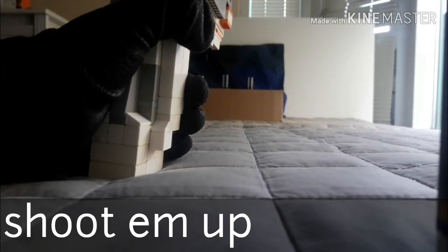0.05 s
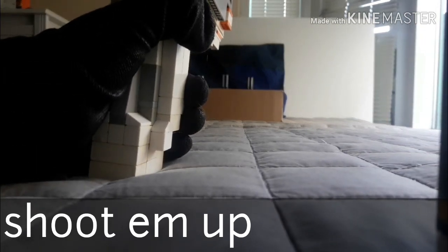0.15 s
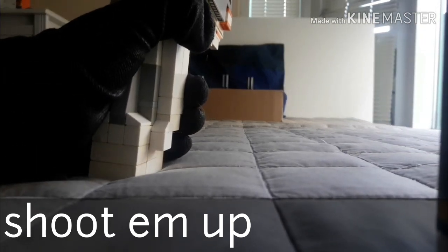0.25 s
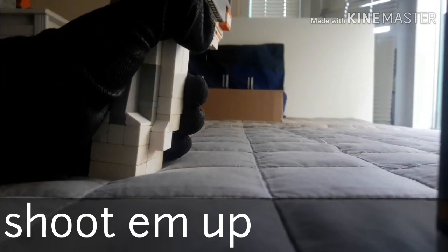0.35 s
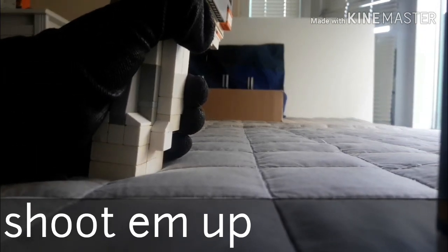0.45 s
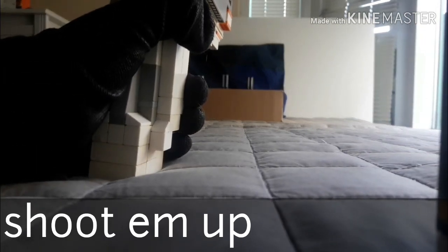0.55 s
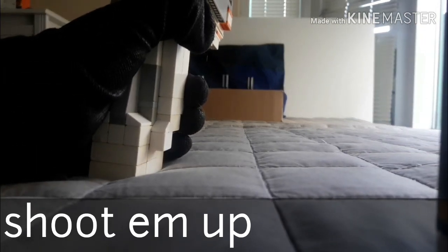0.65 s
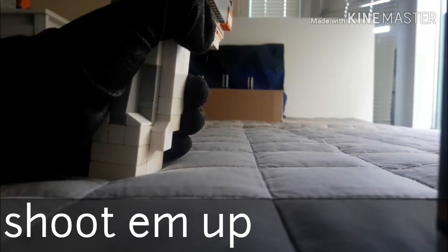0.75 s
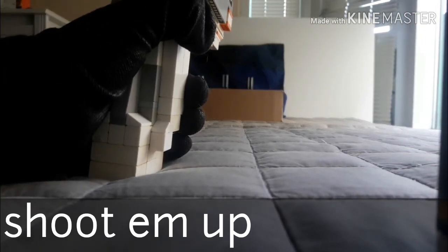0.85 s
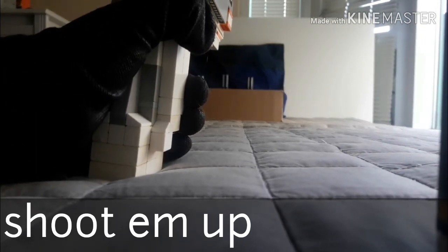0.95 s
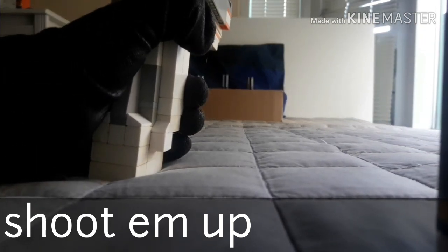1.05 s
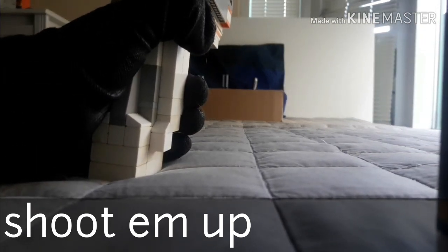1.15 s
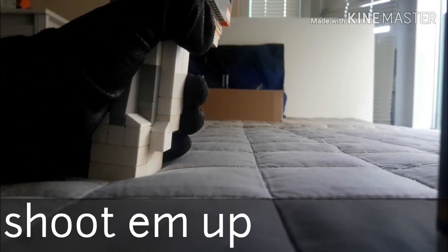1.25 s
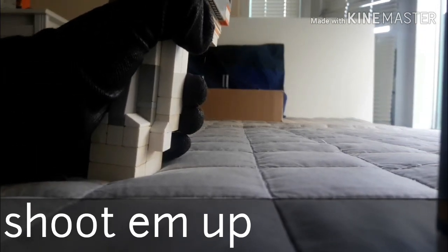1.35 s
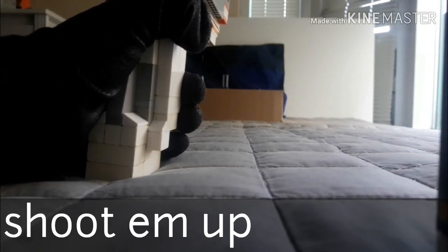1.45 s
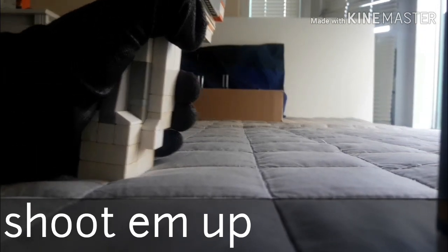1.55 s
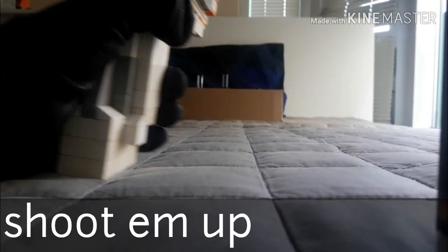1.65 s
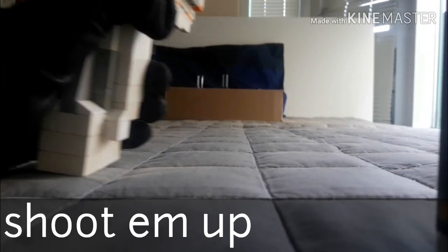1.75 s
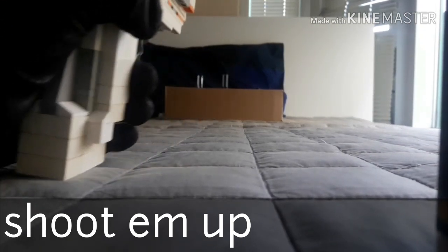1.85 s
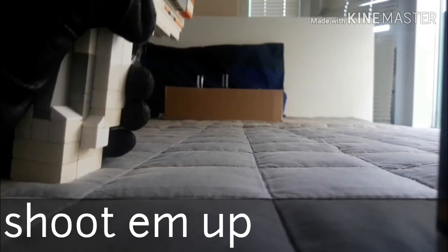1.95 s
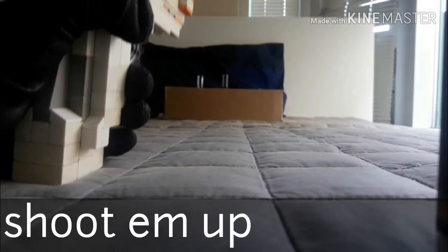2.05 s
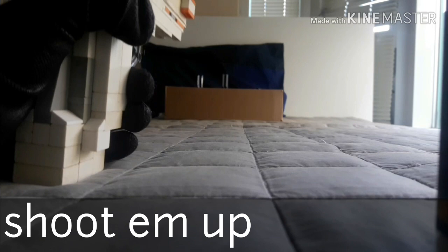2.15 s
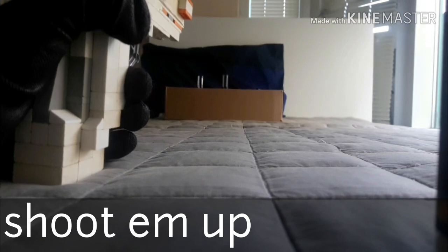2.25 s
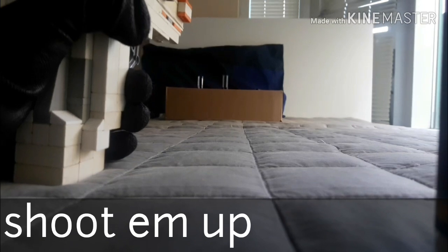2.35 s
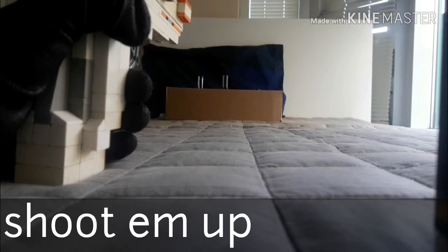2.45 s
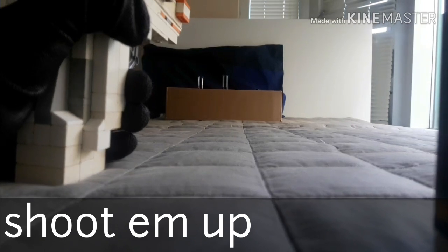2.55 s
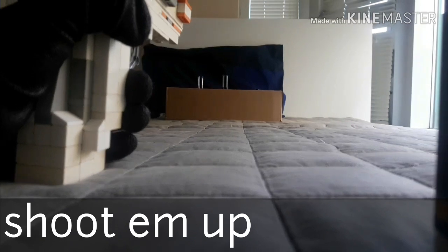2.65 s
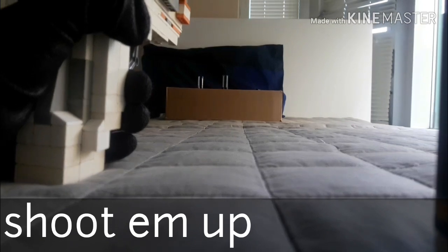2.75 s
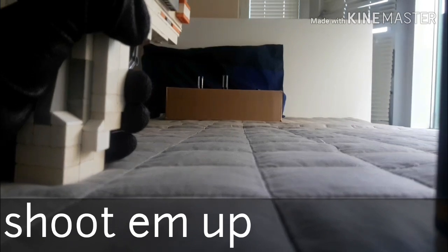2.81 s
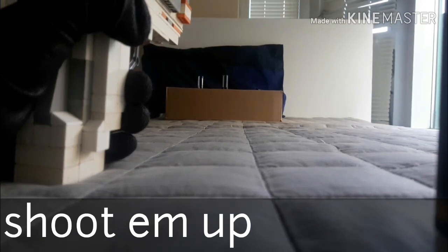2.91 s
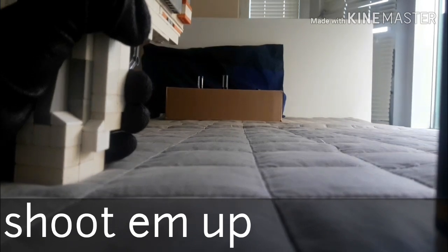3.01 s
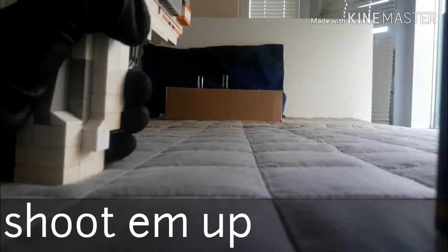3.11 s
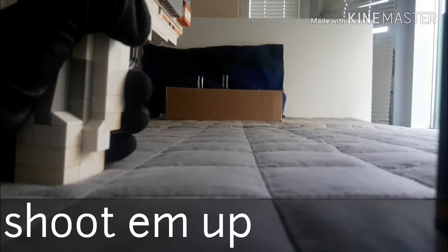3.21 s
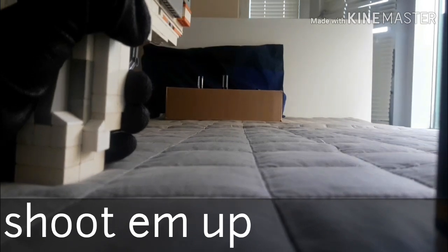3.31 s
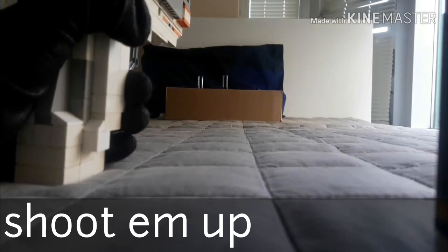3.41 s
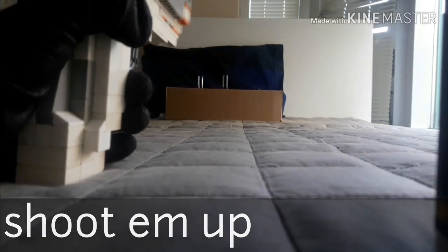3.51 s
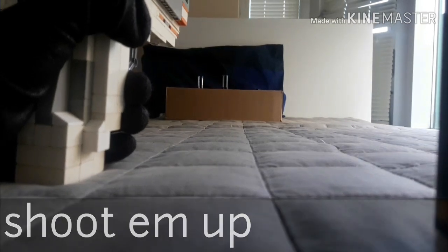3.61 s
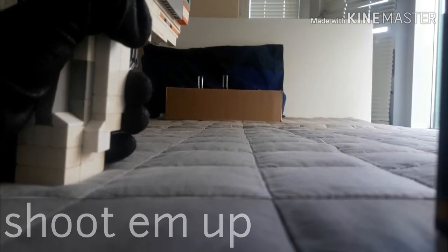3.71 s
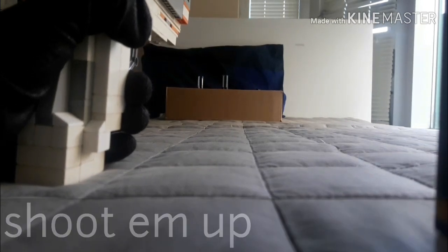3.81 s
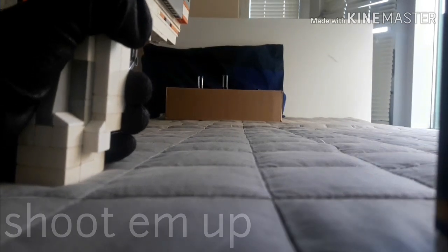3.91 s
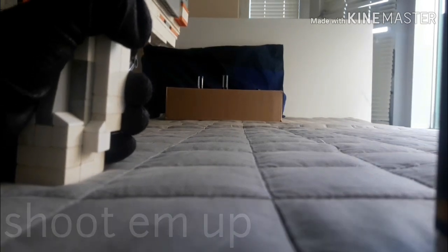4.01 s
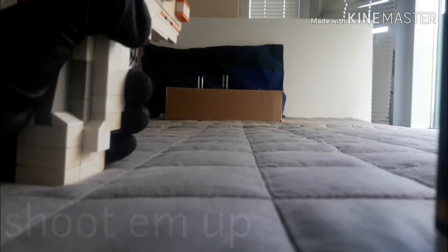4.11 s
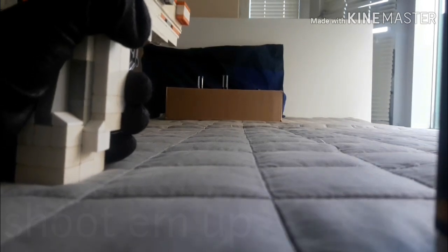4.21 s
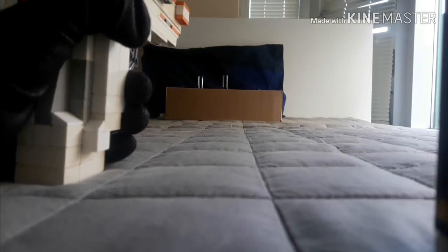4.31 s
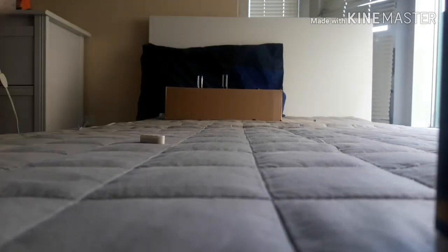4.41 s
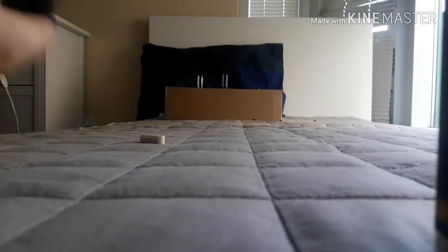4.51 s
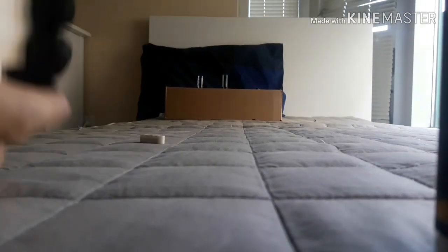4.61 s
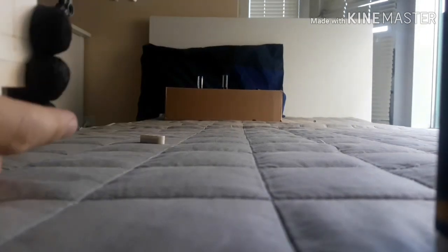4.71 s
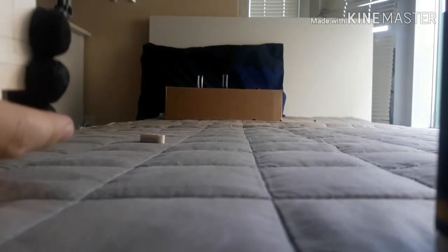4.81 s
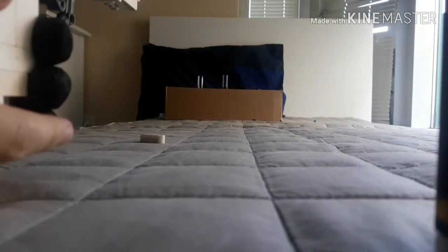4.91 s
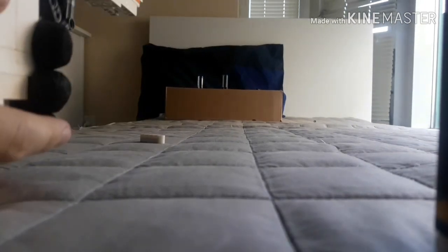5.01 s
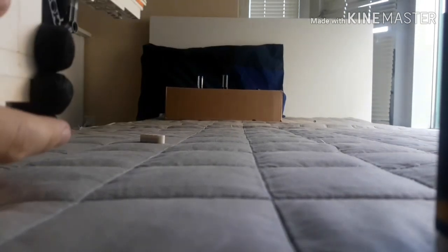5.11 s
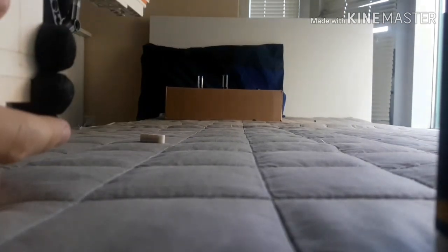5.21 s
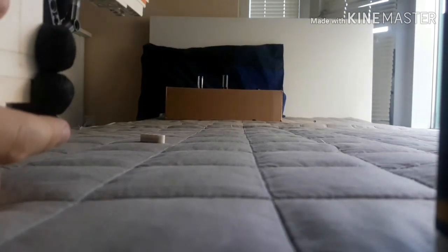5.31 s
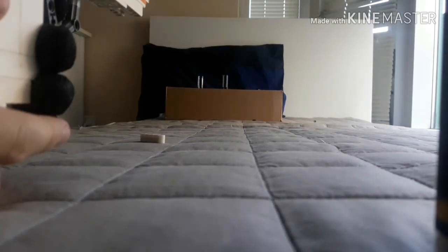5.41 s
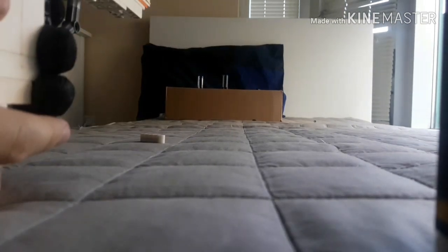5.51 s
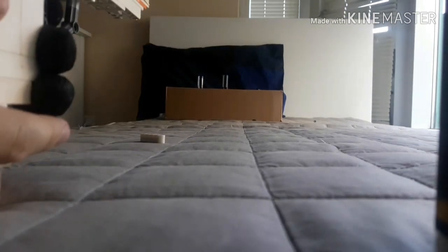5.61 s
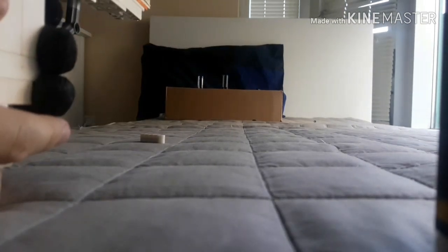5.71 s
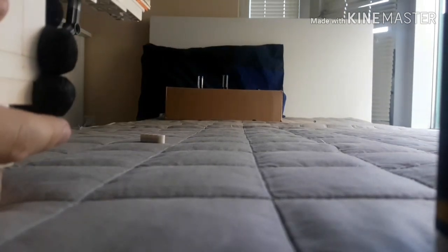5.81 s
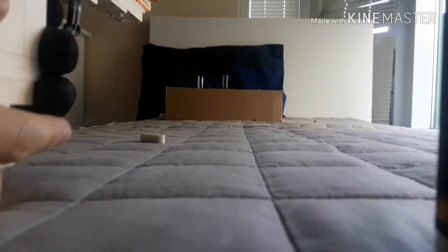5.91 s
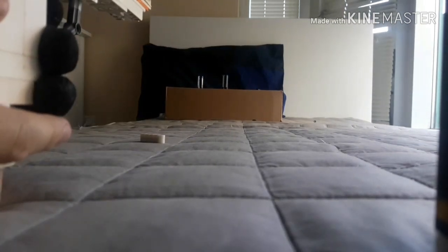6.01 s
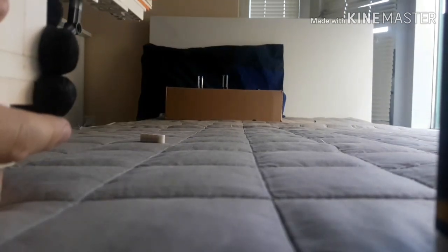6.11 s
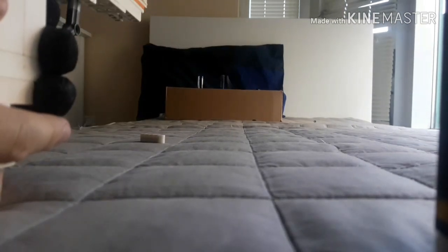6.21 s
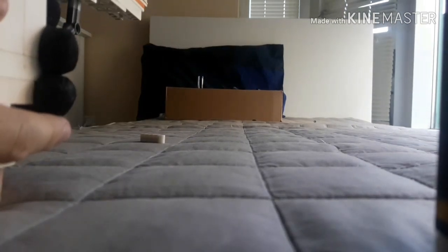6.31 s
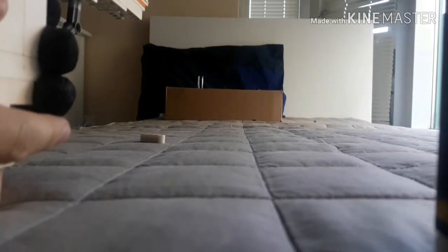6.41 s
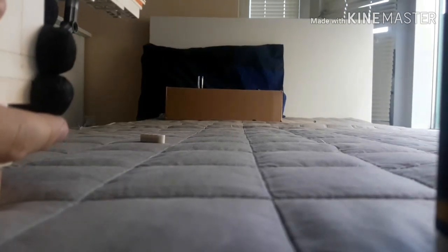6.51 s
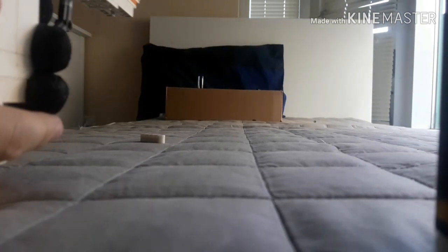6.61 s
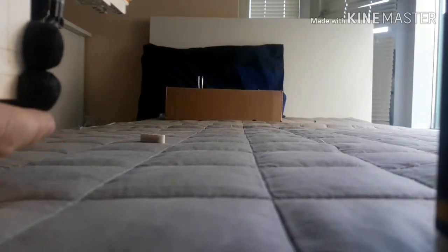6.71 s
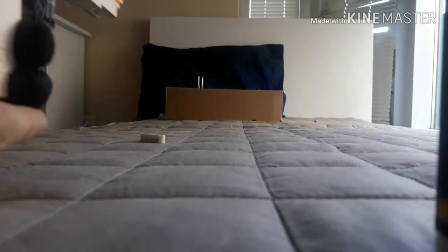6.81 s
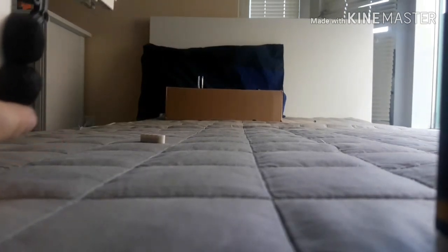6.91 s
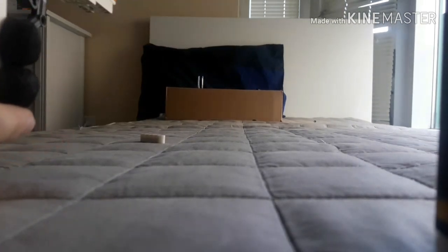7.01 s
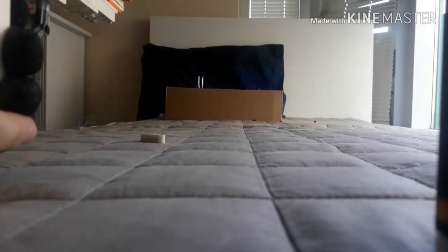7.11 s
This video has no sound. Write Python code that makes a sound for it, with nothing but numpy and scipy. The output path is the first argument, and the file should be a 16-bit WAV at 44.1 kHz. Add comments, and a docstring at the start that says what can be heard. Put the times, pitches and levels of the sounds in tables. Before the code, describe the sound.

In a small bedroom, a plastic-brick toy pistol clacks three times, its bullets thudding and tumbling on cardboard, the slide racked after each shot.

```python
"""A small bedroom, with a faint steady rumble: a toy pistol of plastic bricks fires three times across a bed.
The striker scrapes along its rail and clacks home; the brick bullet thuds on a cardboard target and bounces.
After each shot the slide is racked; bricks tick and creak, a glove rubs, the grip bumps the mattress.
Each contact is a burst of noise, often with a snap, played through the resonances of what it strikes;
nearly all of them get a diffuse tail from the walls. Room air and glove rub are coloured noise."""
import sys
import numpy as np
from scipy import signal
from scipy.fft import rfft, irfft, next_fast_len
from scipy.io import wavfile
from scipy.ndimage import map_coordinates

SR = 44100
rng = np.random.default_rng(int(sys.argv[2]) if len(sys.argv) > 2 else 0)


def output_pcm(signal):
    """Save a mono or channel-first signal as 16-bit PCM at the path in sys.argv[1].

    Samples are clipped to [-1, 1] before scaling.
    """
    pcm = np.clip(np.atleast_2d(signal).T, -1, 1) * 32767
    wavfile.write(sys.argv[1], SR, np.round(pcm).astype(np.int16))


N = 315315
T = np.arange(8192) / SR  # the life of one contact [s]

# Resonances: (frequency [Hz], width [Hz], level [dB])
# the cardboard target, between a broad thud and a broad slap
CARDBOARD_MODES = [(690, 700, -7), (253, 14, -13), (351.3, 20, -2.5), (476, 27, 0), (596, 29, 3),
                   (687, 31, 3.5), (755, 120, 1), (796, 33, -17), (995, 74, -1), (1173, 27, -14),
                   (1244, 150, -2), (1503, 190, -11), (1575, 19, -10), (1630, 110, -8), (3000, 2300, -24)]
# the hollow brick shell
SHELL_MODES = [(990, 390, 1), (1377, 160, 2.5), (1590, 170, 1.5), (1924, 220, 1), (2440, 420, -6.5),
               (2920, 800, -2), (3564, 510, -1), (4270, 270, -5), (4930, 920, -9.5), (6010, 630, -12.5)]
# a lightly touched brick shell
LOOSE_BRICK_MODES = [(736, 176, 9), (1590, 70, 5.5), (2100, 1700, 1), (3030, 210, 3.5), (3700, 110, 3.5),
                     (4600, 1600, -0.5), (11500, 43000, 3.5)]
# a tight joint between bricks
JOINT_MODES = [(1550, 100, 8), (3035, 64, 2.5), (3910, 78, 1)]

# Colours, as relative density per Hz: (frequency [Hz], level [dB])
# low knock of the hollow grip
KNOCK_COLOUR = [(40, -27), (110, -10.5), (300, -7.5), (600, -4), (900, -3), (1200, -5.5), (2000, -75)]
# bright sheen of the brick edges
SHEEN_COLOUR = [(4000, -40), (6500, -4), (8000, -6), (9500, -1), (13000, 0), (16000, -3)]
# weighting of the shell's resonances
SHELL_COLOUR = [(200, -4.5), (800, -29), (1200, 1), (3500, 1), (5500, 0), (7000, -9.5), (8500, -22.5),
                (16000, -2.5)]
# weighting of loose bricks, of the joint and of the glove's rub
TICK_COLOUR = [(200, -4.5), (700, 1.5), (1600, 4), (4000, 1), (5500, -6), (8000, -27.5), (11000, -20),
               (16000, -38)]
# hard crack of the bullet
CRACK_COLOUR = [(400, -50), (1200, -3), (2200, 10.5), (3500, 6), (5000, -7), (7500, -30.5), (11000, -31.5),
                (16000, -29)]
# weighting of the cardboard's resonances
BOARD_COLOUR = [(60, -19.5), (150, -10.5), (260, 6), (1500, 0), (3500, -3), (7500, -40.5)]
# soft thump on the bedding
THUMP_COLOUR = [(40, -29), (100, -7), (170, 0.5), (300, -0.5), (500, -0.5), (800, -1.5), (2000, -70.5)]
# dull push into the mattress
MATTRESS_COLOUR = [(30, -19), (80, -4), (130, -4), (220, -14.5), (450, -20), (1500, -53)]
# steady rumble and hiss of the room
AIR_COLOUR = [(15, -92), (25, -14), (102, 1.5), (141, -2), (277, -2), (373, -8.5), (796, -16), (863, -15),
              (988, -15.5), (1290, -18.5), (1840, -28), (4140, -40.5), (7920, -44), (14400, -32.5),
              (16000, -43)]

# Decay of the bedroom: (frequency [Hz], t60 [s])
ROOM_DECAY = [(100, 0.29), (400, 0.35), (1500, 0.46), (4000, 0.44), (7000, 0.4), (15000, 0.27)]

# Clearer clicks of handled bricks: (time [s], level [dB])
TICKS = [(0.4492, -38), (0.767, -40.5), (0.9554, -26), (2.0017, -30), (2.6239, -34.5), (2.6472, -34),
         (2.7206, -33.5), (3.3663, -36.5), (3.4706, -40), (4.5051, -28.5), (4.587, -28.5), (4.612, -31),
         (4.7963, -33.5), (4.9843, -32.5), (5.7734, -36), (6.7872, -32.5)]
# Soft bumps of the grip on the mattress: (time [s], level [dB])
BUMPS = [(0.636, -52), (1.076, -45), (2.195, -47), (2.786, -48.5), (4.129, -42.5)]
# A tight joint creaks as it is pushed: (start [s], length [s], level [dB])
CREAKS = [(4.795, 0.025, -52), (4.971, 0.084, -53.5)]
# The glove rubs as the hand shifts its grip: (start [s], length [s], level [dB])
RUBS = [(2.353, .8, -74), (4.382, 0.25, -60.5), (4.948, 0.726, -68.5), (6.8, 0.72, -63.5)]
# A brick is pushed into its seat: (start [s], length [s], level [dB])
PUSHES = [(2.733, 0.01, -44), (5.083, 0.019, -38.5)]
# Shots, timed where the striker lands: (time [s], level [dB], low knock re level [dB])
SHOTS = [(1.053, -23, 2), (3.5769, -23, -2.5), (6.2159, -23, -9)]
# The trigger is let go and springs back:
# (time [s], level [dB], low knock re level [dB], rebound re level [dB])
RELEASES = [(1.1151, -19, -12.5, -1.5), (4.3823, -32, -9, -7), (6.2784, -23.5, -1, 0.5)]
# The slide is racked: (pulled [s], at the back stop [s], shut [s],
# pull level [dB], low knock re each contact before shutting [dB], shutting level [dB])
RACKS = [(2.013, 2.0465, 2.0855, -33, -2.5, -22), (4.0544, 4.096, 4.1541, -35.5, 2, -28),
         (6.8175, 6.8549, 6.896, -31, -4, -25.5)]
# The bullet strikes: (time [s], level [dB], crack re level [dB], soft thump re level [dB])
HITS = [(1.153, -30.5, -11, -9), (1.179, -24, -16, 0.5), (1.252, -29, -7.5, -23), (1.341, -26, -2, -18),
        (1.3495, -17.5, -7.5, -7.5), (3.637, -38, -1, -10), (3.664, -36, -8, 8.5), (6.346, -17, -14, -15),
        (6.4343, -16, -11, -14), (6.699, -32.5, -25, -7)]
# It then tumbles in fading bounces:
# (start [s], first flight [s], first level [dB], loss per bounce [dB], crack re level [dB])
TUMBLES = [(1.387, .072, -29.5, 1.84, -6), (6.495, .03, -25.5, 5.5, -12.5), (6.797, .031, -34, 6, -11)]

# How each part clacks: (top sheen re the clack [dB], rattle t60 [s])
STRIKER, TRIGGER, CATCH = (-42, 0.014), (-12, .08), (-26, 0.087)
BACK_STOP, BREECH = (-40, .022), (-23, 0.082)

# Scrapes: levels go in ahead of a lift that all scrapes share
SCRAPE_LIFT_DB = 2.0
STROKE_START = 0.64  # a scrape's early strength over its last
STROKE_S, STROKE_DB = .027, -7  # the striker's run along its rail; its scrape re the blow, before the lift
STROKE_OVERRUN_S = 0.0067  # the scrape outlasts the landing
RAIL_KNOCK_DB, RAIL_SHEEN_DB, DRAG_SHEEN_DB = -7, -22.5, -31  # knock and sheen re the scrape
PUSH_KNOCK_DB, PUSH_SHEEN_DB = -14.5, -21.5  # re the scrape

# Slide and trigger
RELEASE_REBOUND_S = .011
SLACK_S, TAKE_UP_DB = .019, -1.5  # the slide takes up its play with a knock (re pull)
DRAG_S, DRAG_DB = 0.024, -6  # then drags on the frame (re pull, before the lift)
STOP_DB = 2  # the back stop re pull
SHUT_KNOCK_DB, SHUT_REBOUND_S, SHUT_REBOUND_DB = -9, .0075, -3  # levels re the shutting

# Target
TUMBLE_THUMP_DB = -6  # re each bounce
FLIGHT_SHRINK = .91  # each flight over the one before
SPOT_DB, SPOT_DETUNE = 2, 0.0066  # spread of the cardboard's modes from hit to hit: level, share of pitch

# Hand and room
FAINT_TICK_DB, FAINT_SPREAD_DB = -44.5, 4  # fainter random clicks: middle level, reach either way
TICK_TRIM_DB = -11.5  # added to the level of every tick
RUB_EDGE_S, RESTING_RUB_DB = 0.13, -69  # rise and fall of a rub; the constant rub beneath
RUB_SWELL_DB, RUB_GRAIN_DB = 2, 2.5  # slow unsteadiness of a rub, and its fine catching
AIR_DB = -55.5  # rms
BASS_CUT_HZ, TOP_HZ = 28, 15750


def amp(db):
    """Decibels to linear gain."""
    return 10 ** (np.asarray(db) / 20)


def along(points, hz):
    """Read (frequency [Hz], value) points along a log frequency axis."""
    f, v = np.transpose(points)
    return np.interp(np.log(hz + 1), np.log(f), v)


def fade(t, t60):
    """Exponential decay, down 60 dB after t60 seconds."""
    return np.exp(-np.log(1000) * t / np.maximum(t60, 1e-3))


def sized(x, seconds):
    """Scale x to the energy of a unit-rms sound of that length."""
    return x * np.sqrt(seconds * SR / (np.sum(x ** 2) + 1e-20))


def add(track, s, x):
    """Mix x into the track at s seconds."""
    start = max(round(s * SR), 0)
    track[start:start + len(x)] += x[:max(N - start, 0)]


def wobble(rate):
    """A smooth random curve, rate knots a second."""
    knots = rng.standard_normal(int(N * rate / SR) + 4)
    return map_coordinates(knots, [np.arange(N) * rate / SR])


def body(colour, modes=()):
    """Minimum-phase impulse response of a colour, times the resonances if there are any."""
    hz = np.fft.rfftfreq(len(T), 1 / SR)
    gain = amp(along(colour, hz))
    if len(modes):
        power = sum(amp(db) ** 2 / (1 + (2 * (hz - f) / width) ** 2) for f, width, db in modes)
        gain = gain * np.sqrt(power)
    # folding the cepstrum onto positive time makes the response causal
    cepstrum = irfft(np.log(np.maximum(gain, 1e-6)))
    fold = 1 + np.sign(len(T) // 2 - np.arange(len(T)))
    fold[0] = 1
    return irfft(np.exp(rfft(cepstrum * fold)))


def ring(force, response, seconds):
    """A force played through a body, tapered to silence, at a set energy."""
    taper = np.minimum(1, 2 * (1 - T / T[-1]))
    return sized(signal.fftconvolve(force, response)[:len(T)] * taper, seconds)


def grit(spiky_db):
    """Noise of tiny contacts whose strength heads for a new random value every half millisecond."""
    knots = np.arange(0, T[-1], 1 / 2000)
    strength_db = spiky_db * np.interp(T, knots, rng.standard_normal(len(knots)))
    return rng.standard_normal(len(T)) * amp(strength_db)


def blow(chatter, snap):
    """One sharp impulse with the chatter of loose parts."""
    return snap * (T == 0) + chatter / np.linalg.norm(chatter)


def hiss(colour, modes=()):
    """Steady coloured noise of rms 1."""
    noise = rng.standard_normal(N + len(T))
    return sized(signal.fftconvolve(noise, body(colour, modes), "valid")[:N], N / SR)


def room(x, wet_db):
    """A contact with its own diffuse tail from the walls, decaying at a different pace in each band."""
    hz, t, z = signal.stft(rng.standard_normal(SR * 3 // 4), SR, nperseg=256)
    decay = fade(t, along(ROOM_DECAY, hz)[:, None])
    tail = signal.istft(z * decay, SR, nperseg=256)[1]
    # the walls answer a little late
    tail = tail * (1 - np.exp(-(np.arange(len(tail)) / SR / 0.0063) ** 2))
    response = amp(wet_db) * tail / np.linalg.norm(tail)
    response[0] += 1  # direct sound
    return signal.fftconvolve(x, response)


def background():
    """Steady room air, and the glove creeping on the grip as noise through a lightly touched shell."""
    t = np.arange(N) / SR
    rub = amp(RESTING_RUB_DB)
    for s, length, db in RUBS:
        corners = [s - RUB_EDGE_S, s, s + length, s + length + RUB_EDGE_S]
        rub = rub + amp(db) * np.interp(t, corners, [0, 1, 1, 0])
    unsteady = amp(RUB_SWELL_DB * wobble(40) + RUB_GRAIN_DB * wobble(400))
    return amp(AIR_DB) * hiss(AIR_COLOUR) + rub * unsteady * hiss(TICK_COLOUR, LOOSE_BRICK_MODES)


def bumps():
    """The grip presses into the mattress: quick-fading grit through a dull body."""
    out, mattress = np.zeros(N), body(MATTRESS_COLOUR)
    for s, db in BUMPS:
        push = grit(spiky_db=11) * fade(T, 0.024)
        add(out, s, amp(db) * ring(push, mattress, 0.018))
    return out


def rasp():
    """One short, dry rasp, strongest below 4 kHz: shaped, coloured grit with no room tail."""
    out = np.zeros(N)
    shape_db = np.interp(T, [0, .006, .018, .04, .058, .07], [-12, -2, -5.5, -13, -25, -100])
    force = grit(spiky_db=-0.5) * amp(shape_db)
    # (frequency [Hz], level [dB])
    colour = [(100, -57), (400, 0.5), (1000, -5.0), (1750, 4.5), (2400, -7), (4200, -3.5),
              (6000, -14.5), (8000, -30), (10000, -23.5), (14000, -19), (16000, -32)]
    add(out, 4.632, amp(-29.0) * ring(force, body(colour), 0.032))
    return out


def creaks():
    """Stick and slip, as spiky grit, keeps the joint's few resonances singing."""
    out, joint = np.zeros(N), body(TICK_COLOUR, JOINT_MODES)
    for s, length, db in CREAKS:
        push = np.interp(T / max(length, .01), [0, .1, .9, 1], [0, 1, 1, 0])
        creak = ring(grit(spiky_db=8.0) * push, joint, length)
        add(out, s, amp(db) * room(creak, wet_db=-5))
    return out


def faint_ticks(count):
    """One faint click at a random moment in each equal stretch of time: (time [s], level [dB])."""
    stretch_s = N / SR / count
    return [((k + when) * stretch_s, FAINT_TICK_DB + FAINT_SPREAD_DB * (2 * size - 1))
            for k, (when, size) in enumerate(rng.random((count, 2)))]


def ticks():
    """Loose bricks shift in the hand: a small snap and fading chatter ring the shell faintly."""
    out, brick = np.zeros(N), body(TICK_COLOUR, LOOSE_BRICK_MODES)
    for s, db in TICKS + faint_ticks(count=18):
        force = blow(rng.standard_normal(len(T)) * fade(T, 0.055), snap=0.25)
        add(out, s, amp(db + TICK_TRIM_DB) * room(ring(force, brick, 0.0055), wet_db=-7.5))
    return out


def bounces(count):
    """In a tumble each bounce is weaker and each flight shorter than the last."""
    flights = np.cumsum([0] + [FLIGHT_SHRINK ** k for k in range(count - 1)])
    return [(s + flights[k] * gap_s, db - k * loss_db, crack_db, TUMBLE_THUMP_DB)
            for s, gap_s, db, loss_db, crack_db in TUMBLES for k in range(count)]


def cardboard_at_a_spot():
    """The cardboard rings a little differently at each spot: its modes shift in pitch and level."""
    spot = rng.standard_normal((len(CARDBOARD_MODES), 2))
    modes = [(hz * (1 + SPOT_DETUNE * shift), width, level + SPOT_DB * lift)
             for (hz, width, level), (shift, lift) in zip(CARDBOARD_MODES, spot)]
    return body(BOARD_COLOUR, modes)


def target():
    """The bullet cracks on the cardboard, which flaps for a moment, rings and thumps on the bedding."""
    out, crack, thump = np.zeros(N), body(CRACK_COLOUR), body(THUMP_COLOUR)
    # the sheet gives way before it slaps back
    flap = np.interp(T, [0, .008, .018, .024], [0.4, 0.66, 0.51, 0.063])
    for s, db, crack_db, thump_db in HITS + bounces(count=5):
        board = cardboard_at_a_spot()
        chatter = grit(spiky_db=4.5) * flap
        board_force, crack_force = blow(chatter, snap=0.37), blow(chatter, snap=0.3)
        hit = ring(board_force, board, 0.025)
        hit = hit + amp(crack_db) * ring(crack_force, crack, 0.02)
        hit = hit + amp(thump_db) * ring(board_force, thump, 0.013)
        add(out, s, amp(db) * room(hit, wet_db=-3.0))
    return out


def clack(s, db, knock_db, part):
    """A hard contact of one part: a snap and a dying rattle."""
    sheen_db, t60 = part
    rattle = fade(T, t60)
    force = blow(grit(spiky_db=5) * rattle, snap=.55)
    return s, db, force, rattle, 0.0035, knock_db, sheen_db


def scrape(s, length, db, knock_db, sheen_db):
    """Brick slides on brick, its grit growing over the stroke."""
    end = max(length, .004)
    stroke = np.interp(T, [0, .003, end, end + 0.0062], [0.05, STROKE_START, 1, 0.025])
    force = grit(spiky_db=5) * stroke
    return s, db + SCRAPE_LIFT_DB, force, stroke, end, knock_db, sheen_db


def loading():
    """The slide leaves its catch, drags to the back stop, then shuts with a rebound; bricks are pushed home."""
    contacts = []
    for s, stop_s, shut_s, pull_db, knock_db, shut_db in RACKS:
        contacts += [clack(s, pull_db, knock_db, CATCH),
                     clack(s + SLACK_S, pull_db + TAKE_UP_DB, knock_db, BACK_STOP),
                     scrape(s + SLACK_S, DRAG_S, pull_db + DRAG_DB, knock_db, DRAG_SHEEN_DB),
                     clack(stop_s, pull_db + STOP_DB, knock_db, BACK_STOP),
                     clack(shut_s, shut_db, SHUT_KNOCK_DB, BREECH),
                     clack(shut_s + SHUT_REBOUND_S, shut_db + SHUT_REBOUND_DB, SHUT_KNOCK_DB, BREECH)]
    for s, length, db in PUSHES:
        contacts.append(scrape(s, length, db, PUSH_KNOCK_DB, PUSH_SHEEN_DB))
    return contacts


def firing():
    """The striker scrapes along its rail and lands; the freed trigger snaps back and rebounds once."""
    contacts = []
    for s, db, knock_db in SHOTS:
        contacts += [scrape(s - STROKE_S, STROKE_S + STROKE_OVERRUN_S, db + STROKE_DB,
                            RAIL_KNOCK_DB, RAIL_SHEEN_DB),
                     clack(s, db, knock_db, STRIKER)]
    for s, db, knock_db, rebound_db in RELEASES:
        contacts += [clack(s, db, knock_db, TRIGGER),
                     clack(s + RELEASE_REBOUND_S, db + rebound_db, knock_db, TRIGGER)]
    return contacts


def pistol():
    """Clacks and scrapes both drive the hollow grip, the brick shell and the bright edges of the bricks."""
    out = np.zeros(N)
    shell, grip, edges = body(SHELL_COLOUR, SHELL_MODES), body(KNOCK_COLOUR), body(SHEEN_COLOUR)
    for s, db, force, envelope, seconds, knock_db, sheen_db in firing() + loading():
        knock = amp(knock_db) * ring(force, grip, seconds)
        # the sheen comes from so many tiny contacts that it is smooth
        smooth = rng.standard_normal(len(T)) * envelope
        sheen = amp(sheen_db) * ring(smooth, edges, seconds)
        bricks = room(ring(force, shell, seconds), wet_db=-4.5) + room(knock + sheen, wet_db=-6.5)
        add(out, s, amp(db) * bricks)
    return out


def scene():
    """All the layers, mixed to one channel."""
    return (background() + bumps() + rasp() + creaks() + ticks() + target() + pistol())[None]


def record(dry):
    """The phone drops the deepest bass and keeps nothing above its band limit."""
    m = next_fast_len(N + SR // 2)
    hz = np.fft.rfftfreq(m, 1 / SR)
    bass_cut = (1j * hz / (1j * hz + BASS_CUT_HZ)) ** 2
    return irfft(rfft(dry, m) * bass_cut * (hz < TOP_HZ), m)[..., :N]


dry = scene()
out = record(dry)
output_pcm(out)
```